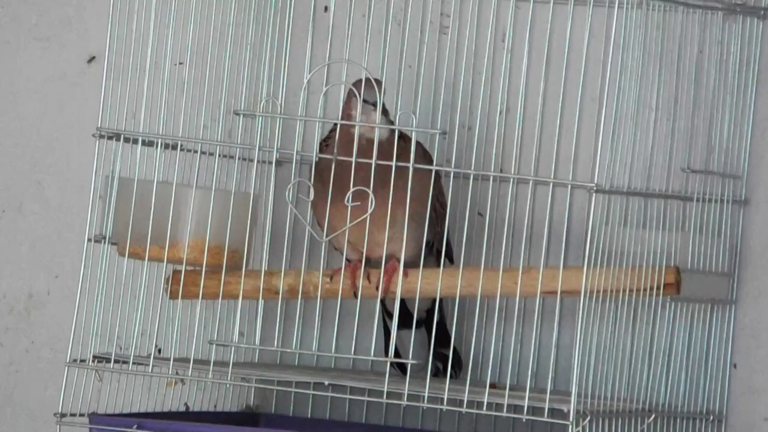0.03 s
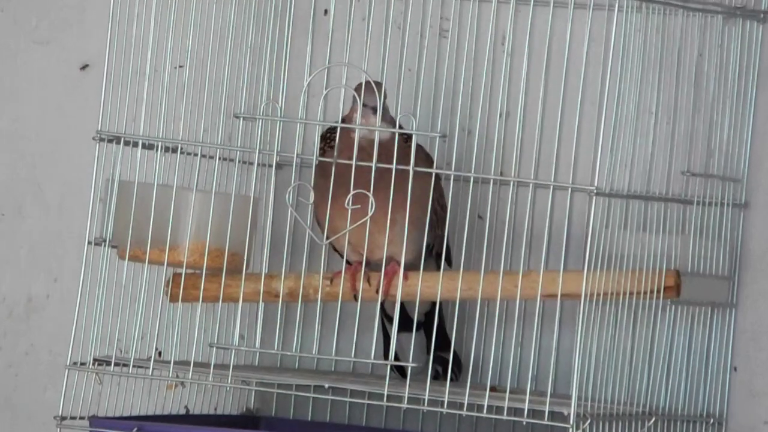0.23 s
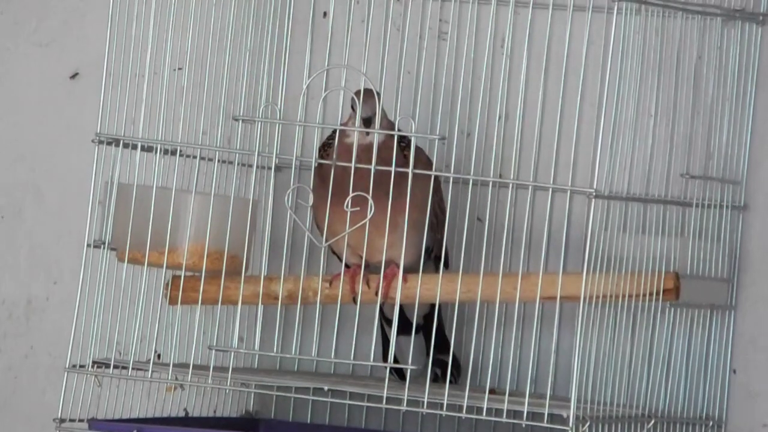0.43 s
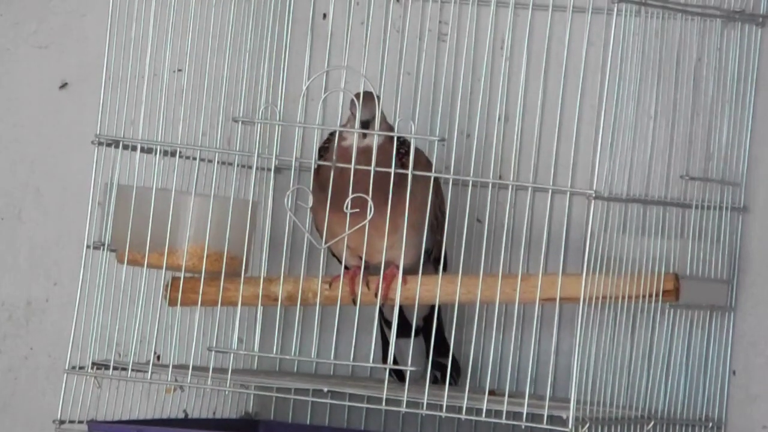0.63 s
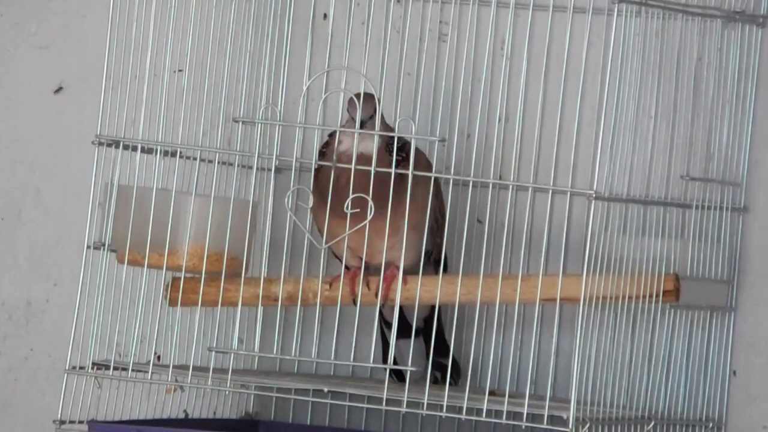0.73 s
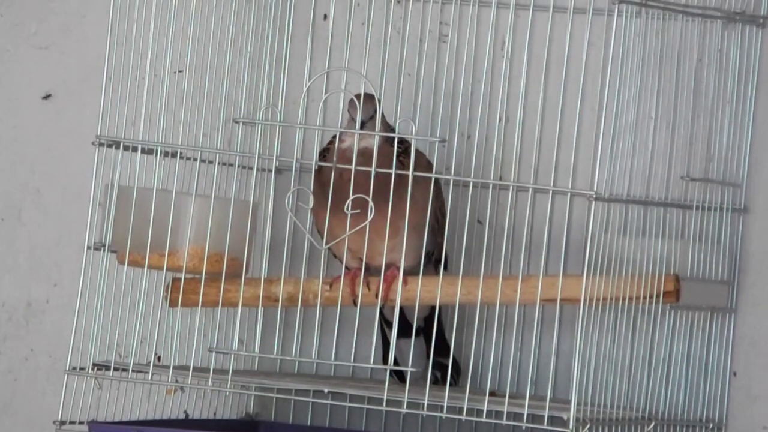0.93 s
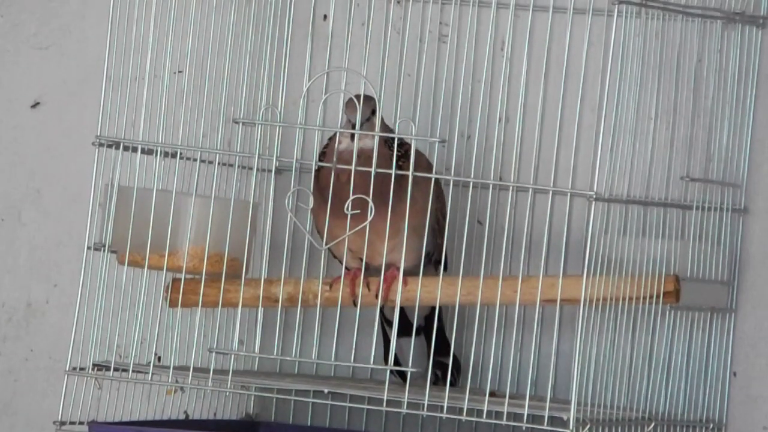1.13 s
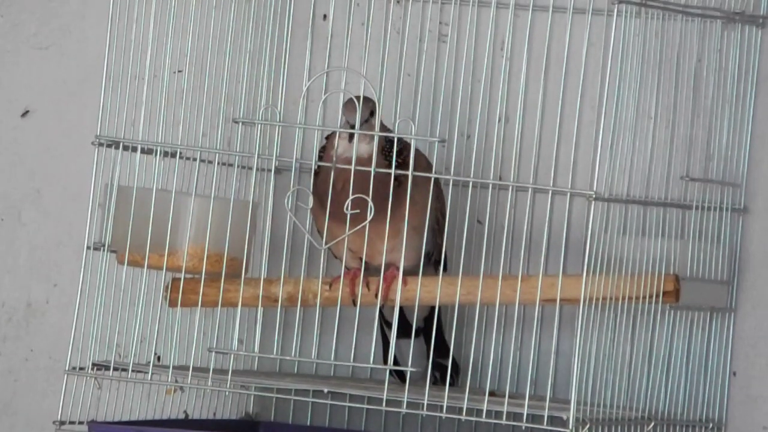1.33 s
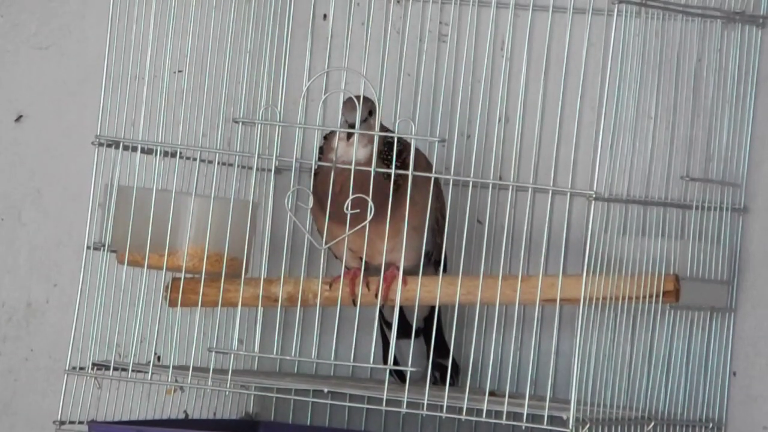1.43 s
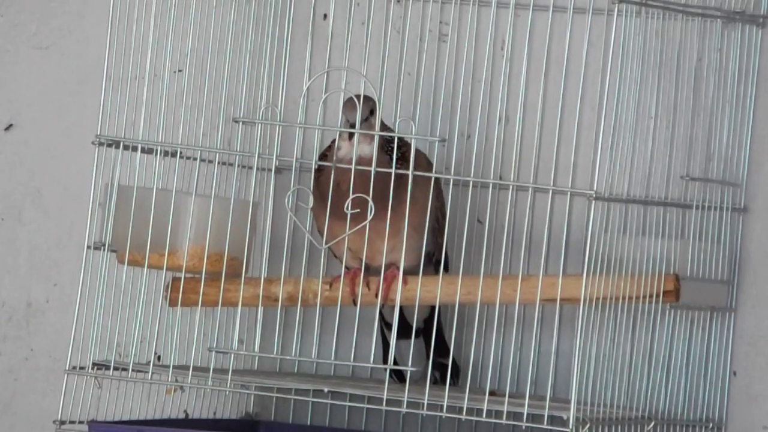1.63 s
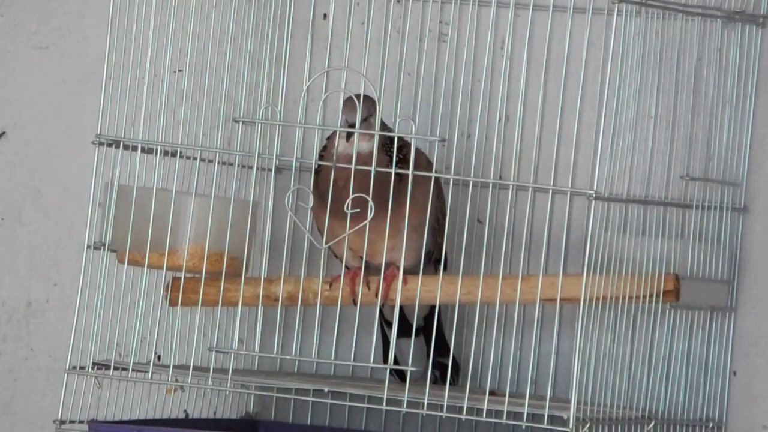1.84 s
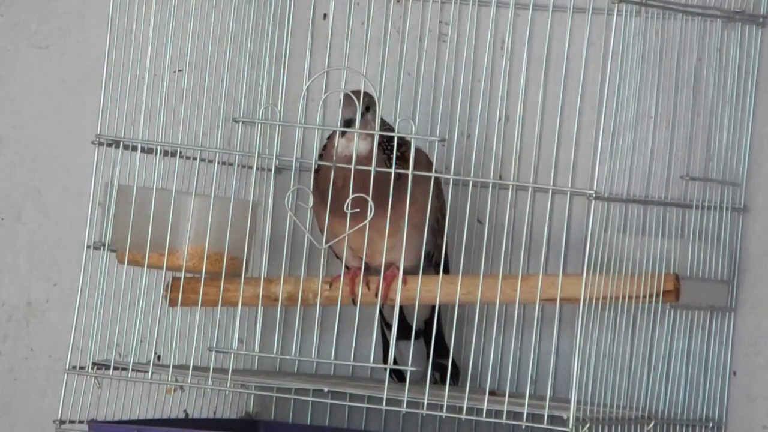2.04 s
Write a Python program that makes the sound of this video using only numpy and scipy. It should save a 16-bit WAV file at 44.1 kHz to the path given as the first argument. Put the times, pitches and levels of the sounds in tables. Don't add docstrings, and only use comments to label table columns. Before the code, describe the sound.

A caged dove coos close by in an echoing shed, with cage clangs and insect hiss behind

```python
import sys
import numpy as np
from scipy import signal
from scipy.fft import rfft, irfft
from scipy.io import wavfile
from scipy.ndimage import uniform_filter1d

SR = 44100
rng = np.random.default_rng(int(sys.argv[2]) if len(sys.argv) > 2 else 0)


def master_out(mix):
    frames = np.transpose(np.atleast_2d(mix))
    ceiling = np.clip(frames, -1, 1)
    pcm = np.round(ceiling * 32767).astype(np.int16)
    wavfile.write(sys.argv[1], SR, pcm)


def decibels_to_gain(level_db):
    exponent = np.asarray(level_db, float) / 20
    return 10 ** exponent


N = 92036
T = np.arange(N) / SR


def evened(x):
    return x / np.sqrt(np.mean(x ** 2) + 1e-20)


def read(points, hz):
    f, value = np.transpose(points)
    return np.interp(np.log(hz + 1), np.log(f + 1), value)


def curve(points, order=1):
    p = np.transpose(points)
    return uniform_filter1d(np.interp(T, p[0], p[order]), size=200)


def smooth(z, width_hz, count=2):
    r = np.exp(-np.pi * max(width_hz, 1) / SR)
    for _ in range(count):
        z = signal.lfilter([1 - r], [1, -r], z)
    return z


def fuzzy(hz, width_hz, steady=1.0):
    z = smooth(rng.standard_normal((N, 2)) @ [1, 1j], width_hz)
    z = smooth(z / (abs(z) + 1e-9) ** steady, 4 * width_hz)
    return evened((z * np.exp(2j * np.pi * hz * T)).real)


def hump(start_s, length_s):
    return np.sin(np.pi * np.clip((T - start_s) / length_s, 0, 1))


# f/Hz, correlation
SAME = [(60, 0.94), (150, 0.75), (380, 0.95), (950, 0.99), (2380, 0.94), (5980, 0.74), (9500, .55),
        (15000, 0.25)]
# f/Hz, L-R level/dB
LEAN = [(60, -1), (180, -1), (550, -1), (1650, 0), (4970, 0.8), (9000, .2), (15000, 2.5)]


def noise(shape, patchy_db):
    frames, hz = N // 128 + 5, np.fft.rfftfreq(512, 1 / SR)
    a, b, c, d, patches = rng.standard_normal((frames, 257, 5)).T
    patches = uniform_filter1d(patches, size=6, axis=0)
    patches = evened(uniform_filter1d(patches, size=20, axis=1))
    same = np.clip(read(SAME, hz), -1, 1)[:, None]
    left = a + 1j * b
    right = same * left + np.sqrt(1 - same ** 2) * (c + 1j * d)
    z = np.array([left, right])
    z *= decibels_to_gain(read(shape, hz)[:, None] + patchy_db * patches)
    z *= decibels_to_gain(np.array([.5, -.5])[:, None, None] * read(LEAN, hz)[:, None])
    return evened(signal.istft(z, nperseg=512, noverlap=384)[1][:, :N])


# f/Hz, level/dB per Hz
RUMBLE = [(20, -22), (40, 6.5), (70, -3.5), (120, -9.5), (200, -21.5), (400, -39)]


def rumble():
    hz = np.fft.rfftfreq(N, 1 / SR)
    z = rfft(rng.standard_normal((N, 2)).T) * decibels_to_gain(read(RUMBLE, hz) - 40 * (hz < 18))
    a, b = irfft(z, N)
    lumps = decibels_to_gain(1.5 * evened(uniform_filter1d(rng.standard_normal(N), size=3000)))
    pair = np.array([.93 * (a + .12 * b), 1.07 * (a - .12 * b)])
    return decibels_to_gain(-45.5) * evened(pair * lumps)


# f/Hz, level/dB per Hz
AIR = [(100, -12), (200, -4), (450, -3), (900, 0), (1250, -5), (1600, -2), (1850, -11), (4000, -11),
       (9000, -27), (13000, -36), (15700, -50)]


def air():
    return decibels_to_gain(-52) * noise(AIR, patchy_db=3.0)


# f/Hz, level/dB per Hz
CICADA = [(3000, -32), (4500, -13), (5500, -2), (6300, 0), (6900, -4), (7700, -15), (10000, -30),
          (15700, -58)]
# t/s, level/dB
SWELL = [(0, -0.5), (.3, 3), (.42, 4), (.55, 3), (.68, 7), (.8, 3.5), (.9, 4.5), (1.05, 2.5), (1.2, 6.5),
         (1.42, 2), (1.7, 5.5), (2.09, 5.5)]


def insects():
    strokes_per_s, start_cycles = 25.85, 0.54
    throb = np.maximum(np.sin(2 * np.pi * (strokes_per_s * T + start_cycles)) + 1, 0) ** 2
    cricket = decibels_to_gain(-52) * evened(throb * fuzzy(6670, 25, steady=.7))
    cicadas = decibels_to_gain(-49 + curve(SWELL)) * noise(CICADA, patchy_db=1.5)
    return cicadas + cricket * decibels_to_gain([[.6], [-.6]])


# t/s, crash level/dB, dull part re crash/dB, ring level/dB, rise/s, t60/s
CLANGS = [
    (.098, -56, 22, -77, .004, 0.11),
    (.186, -38.5, -10, -78, 0.014, 0.37),
    (.32, -50.5, 1, -72, 0.011, 1),
    (.545, -49.5, 5, -82, 0.0071, 0.69),
    (.665, -44, -4, -71, 0.025, 0.21),
    (.848, -40, 8, -51, 0.02, 0.33),
    (1.18, -47, -16, -68, 0.0093, 0.67),
    (1.525, -44.5, 11, -59, 0.024, 1),
    (1.592, -42.5, 1, -38.5, 0.016, 0.78),
    (1.835, -26, -1.5, -31, 0.033, 0.61),
]
# f/Hz, level/dB per Hz
CRASH = [(59, -32), (200, -13.5), (438, -15.5), (900, -14.5), (1500, -13), (2370, -15), (3700, -12),
         (5630, -8.5), (8000, -21), (12000, -31), (15500, -53)]
WIRE_HZ = [1520, 1800, 2380, 2690, 3288, 3610, 3710, 3835, 4292, 4392, 5208, 5560, 5750, 6050, 6970, 7058,
           7665, 9400, 11600]
WIRE_WIDTH_HZ = [80, 70, 65, 60, 60, 80, 120, 60, 130, 90, 100, 130, 100, 80, 90, 80, 50, 80, 120]
# level in early clangs/dB, level in last clang/dB, share of t60
WIRE = [(-6, -4, 0.45), (-6.5, -21, .6), (-3.5, -2.5, 0.69), (-10, -20, 0.73), (-1.5, -4.5, 0.73),
        (-10, -8, .8), (-15, -1, 1.1), (-8, -6, 0.6), (-5.5, 0.5, 1.24), (-0.5, -1.5, .9),
        (-1.5, -3.5, 0.86), (-7.5, 1, 0.94), (-4.5, -12, 0.54), (-27, -17, 0.55), (-23, -5, 0.48),
        (-29, -3, 0.64), (-30, -10, 0.53), (-24, -22.5, .7), (-29, -37, .6)]


def wire_modes():
    return np.array([fuzzy(hz, width_hz, steady=.1) for hz, width_hz in zip(WIRE_HZ, WIRE_WIDTH_HZ)])


def clangs():
    wash_db, wash_t60_s, wash_rise_s = -14, 1.057, 0.1
    spread = 0.13
    crash = noise(CRASH, patchy_db=1.5)
    dull = signal.filtfilt(*signal.butter(2, 2300, fs=SR), crash)
    near, side = wire_modes(), wire_modes()
    early_db, last_db, share = np.transpose(WIRE)[:, :, None]
    out = 0
    for k, (s, crash_db, dull_db, ring_db, rise_s, t60_s) in enumerate(CLANGS):
        t = np.maximum(T - s, 0)
        onset = np.minimum(t / rise_s, 1)
        mode_db = last_db if k == len(CLANGS) - 1 else early_db
        fall = decibels_to_gain(ring_db + mode_db - 60 * t / (t60_s * np.maximum(share, .2)))
        rings = (fall * near).sum(0) + np.array([[1], [-1]]) * spread * (fall * side).sum(0)
        wash = decibels_to_gain(wash_db - 60 * t / wash_t60_s) * np.minimum(t / wash_rise_s, 1)
        body = onset * decibels_to_gain(-60 * t / t60_s) + wash
        out = out + body * decibels_to_gain(crash_db) * (crash + (decibels_to_gain(dull_db) - 1) * dull) + onset * rings
    return out


def voice(hz, level, flutter=()):
    wobble = .007 * evened(uniform_filter1d(rng.standard_normal(N), size=300))
    turn = 2 * np.pi * np.cumsum(hz * (1 + wobble)) / SR
    sides = sum(decibels_to_gain(db) * np.sin(turn + 2 * np.pi * off_hz * T) for off_hz, db in flutter)
    return level * np.sqrt(2) * (np.sin(turn) + decibels_to_gain(-46) * np.sin(2 * turn) + sides)


def husk():
    lumps = uniform_filter1d(rng.standard_normal(N), size=350)
    return decibels_to_gain(4 * evened(uniform_filter1d(lumps, size=350)) - 2.0)


def soft_ends(points):
    return np.clip(np.minimum(T - points[0][0], points[-1][0] - T) / .006, 0, 1)


def note(points, flutter=()):
    level = uniform_filter1d(decibels_to_gain(curve(points, order=2)), size=400)
    return voice(curve(points), level * soft_ends(points), flutter)


# t/s, f/Hz, held tone between throbs level/dB
TRILL = [(.925, 615, -60), (.945, 690, -52), (1.0, 690, -50), (1.16, 674, -46), (1.215, 682, -40),
         (1.24, 660, -34), (1.265, 605, -31), (1.32, 572, -36), (1.36, 530, -48), (1.41, 490, -48),
         (1.44, 475, -58)]
# centre t/s, level/dB
THROBS = [(0.944, -22), (0.963, -31.5), (0.983, -24.5), (1.003, -23), (1.029, -21), (1.051, -23.5),
          (1.073, -22.5), (1.093, -22), (1.117, -21), (1.136, -22), (1.161, -21), (1.179, -23.5),
          (1.2, -26.5), (1.217, -19), (1.238, -22), (1.262, -34.5), (1.284, -51), (1.304, -65),
          (1.318, -36), (1.337, -77), (1.36, -80), (1.379, -64), (1.416, -56.5)]
# offset f/Hz, level/dB
FLUTTER = [(120, -18), (-75, -17), (-125, -23)]


def trill():
    longest_s, flips, glide_share = .032, 14, .085
    gate = decibels_to_gain(curve(TRILL, order=2)) * soft_ends(TRILL)
    beat, glide = gate.copy(), np.zeros(N)
    lengths_s = np.minimum(np.gradient(np.transpose(THROBS)[0]), longest_s)
    lengths_s[0] = longest_s
    for k, ((s, db), length_s) in enumerate(zip(THROBS, lengths_s)):
        u = np.clip((T - s) / length_s + .5, 0, 1)
        throb = decibels_to_gain(db) * np.sin(np.pi * u)
        gate += throb
        beat += (-1) ** min(k, flips) * throb
        glide += throb * (u - .5)
    flutter_gate = uniform_filter1d(gate * (T > .96) * (T < 1.24), size=700)
    sides = sum(voice(curve(TRILL) + off_hz, decibels_to_gain(db) * husk() * flutter_gate) for off_hz, db in FLUTTER)
    return sides + voice(curve(TRILL) * (1 + glide_share * glide / (gate + 1e-6)), beat)


# t/s, f/Hz, level/dB
GRUNT = [(.262, 536, -76), (.275, 565, -38.5), (.3, 552, -37), (.312, 580, -61), (.335, 559.4, -45.5),
         (.36, 568, -64), (.372, 570, -65)]
ARCH = [(.528, 720, -66), (.542, 715, -49), (.556, 700, -58), (.578, 695, -35), (.592, 700, -39),
        (.606, 706, -19.5), (.62, 745, -34), (.657, 765, -36), (.667, 750, -46), (.676, 745, -31),
        (.693, 720, -18), (.703, 690, -19), (.714, 665, -26), (.732, 650, -35)]
UNDER = [(.553, 570, -48), (.566, 582, -31), (.593, 610, -32), (.608, 590, -40), (.635, 580, -38),
         (.66, 580, -44), (.71, 590, -42), (.74, 550, -48)]
ARCH_RING = [(.725, 715, -40), (.74, 700, -39), (.755, 695, -32), (.775, 740, -35), (.8, 730, -43),
             (.825, 750, -39), (.866, 735, -47), (.9, 748, -46), (.925, 745, -55)]
LAST = [(1.724, 560, -55), (1.743, 597, -29), (1.757, 648, -26), (1.772, 675, -18.5), (1.824, 680, -20),
        (1.842, 668, -29), (1.859, 660, -23), (1.872, 640, -31), (1.895, 590, -44)]
LAST_RING = [(1.865, 680, -36), (1.89, 680, -33), (1.918, 678, -44), (1.94, 678, -38), (1.975, 680, -39),
             (2.0, 682, -47), (2.08, 682, -60)]
# offset f/Hz, level/dB
GRUNT_OVER = [(130, -7)]


def dove():
    arch = note(ARCH) + husk() ** .5 * note(UNDER) + husk() * note(ARCH_RING)
    return note(GRUNT, GRUNT_OVER) + arch + trill() + note(LAST) + note(LAST_RING)


# delay t/s, level/dB
WALLS = [
    (.004, -20),
    (.058, -16),
]


def shed(x):
    t60_s, rise_s, tail_db, same = .65, 0.059, -16, 0.99
    taps = np.zeros((2, SR))
    at = np.arange(1200, SR - 20, 20) + rng.integers(0, 20, (2, (SR - 1201) // 20))
    np.put_along_axis(taps, at, rng.choice([-1., 1.], at.shape), 1)
    taps[1] = same * taps[0] + np.sqrt(1 - same ** 2) * taps[1]
    taps *= decibels_to_gain(-60 * T[:SR] / t60_s) * np.minimum(T[:SR] / rise_s, 1)
    taps *= decibels_to_gain(tail_db) / np.linalg.norm(taps[0])
    taps[:, 0] = 1
    for s, db in WALLS:
        taps[:, round(s * SR)] += decibels_to_gain(db)
    return signal.fftconvolve(x[None], taps, axes=1)[:, :N] * decibels_to_gain([[-.5], [.5]])


# start t/s, length/s, level/dB, f/Hz, width/Hz
CHIRP = (.375, .11, -47, 5300, 250)


def chirp():
    s, length_s, db, hz, width_hz = CHIRP
    return decibels_to_gain(db) * hump(s, length_s) * fuzzy(hz, width_hz, steady=0.42)


# t/s, level/dB, f/Hz
PEEPS = [
    (.549, -47, 2750),
    (.574, -53, 2700),
    (.608, -50, 2650),
    (.646, -55, 2700),
    (.693, -47, 2750),
    (.741, -53, 2650),
]


def peeps():
    return sum(decibels_to_gain(db) * hump(s, .014) ** 2 * fuzzy(hz, 200, steady=.9) for s, db, hz in PEEPS)


# start t/s, length/s, level/dB, f/Hz
FAR = [
    (1.415, 0.11, -47.5, 398),
    (1.628, 0.12, -43, 402.2),
    (1.848, 0.063, -40.5, 400),
]


def far_dove():
    return sum(decibels_to_gain(db) * hump(s, length_s) * np.sin(2 * np.pi * hz * T) for s, length_s, db, hz in FAR)


# f/Hz, level/dB per Hz
BOOM = [(60, -22), (120, 0.5), (280, -9.5), (500, -9.5), (1000, -9.5), (2000, -46)]


def boom():
    u = np.maximum(T - CLANGS[-1][0], 0) / .1
    return decibels_to_gain(-46.5) * u * np.exp(1 - u) * noise(BOOM, patchy_db=1.5)


def scene():
    birds = shed(dove() + far_dove()) + peeps()
    return birds + clangs() + boom() + insects() + chirp() + rumble() + air()


def top_cut(x):
    return signal.sosfilt(signal.butter(12, 15710, fs=SR, output="sos"), x)


# t/s, level/dB
FADE = [(0, -64), (.05, -32.5), (.1, -20.5), (.15, -11.5), (.2, 1), (.26, -0.5), (2.05, -0.5), (2.09, -3)]


def record(dry):
    low_pass = signal.firwin(511, 15700, window=("kaiser", 9), fs=SR)
    mix = signal.oaconvolve(dry * decibels_to_gain(curve(FADE)), low_pass[None], "same")
    return top_cut(mix)


dry = scene()
out = record(dry)
master_out(out)
```